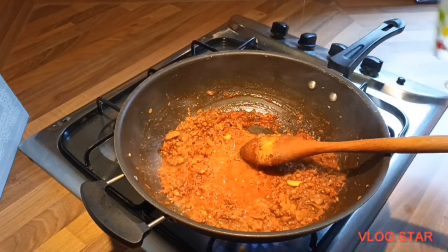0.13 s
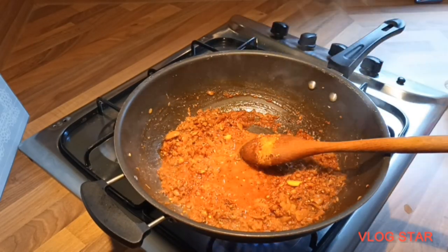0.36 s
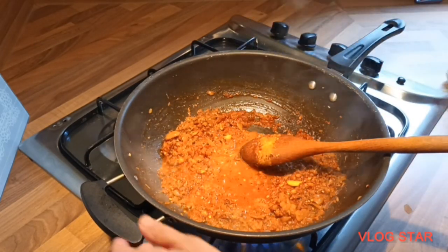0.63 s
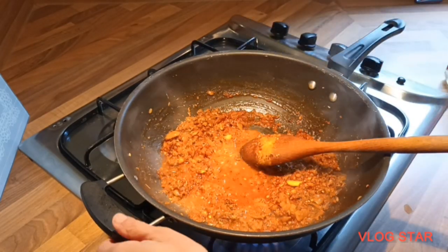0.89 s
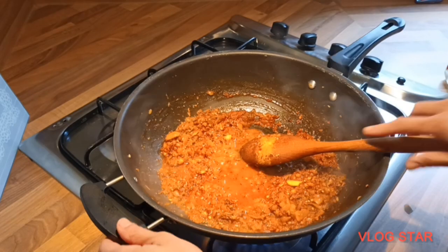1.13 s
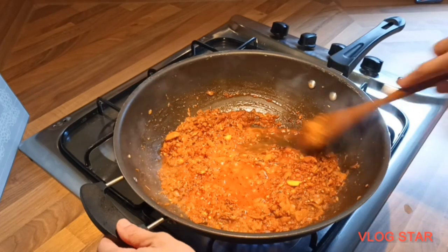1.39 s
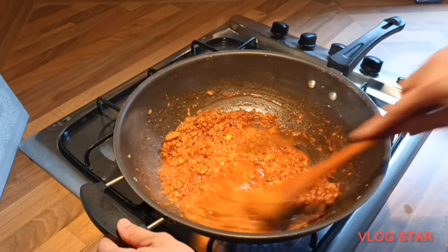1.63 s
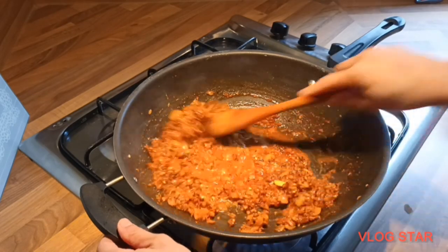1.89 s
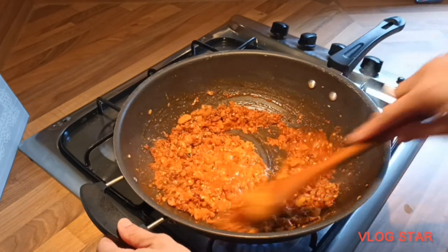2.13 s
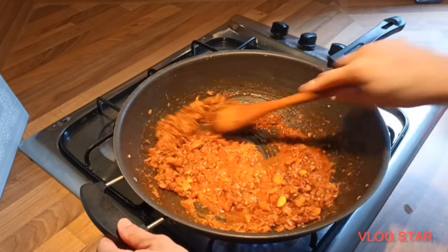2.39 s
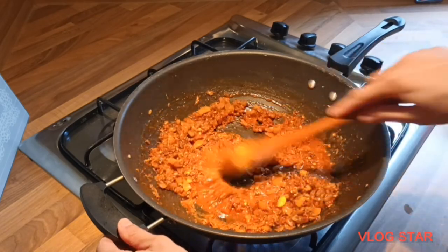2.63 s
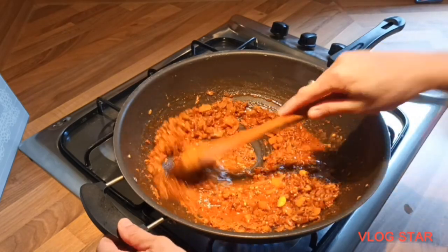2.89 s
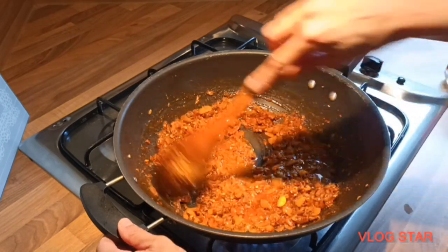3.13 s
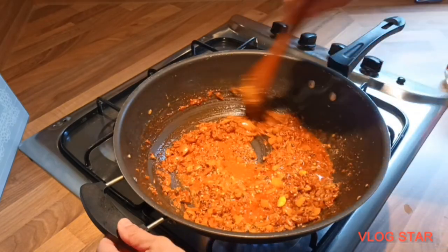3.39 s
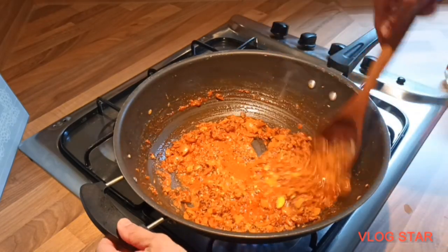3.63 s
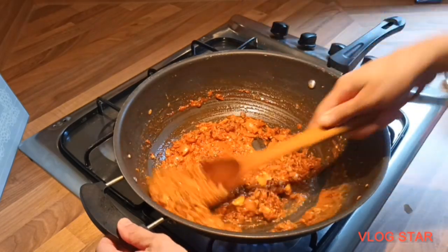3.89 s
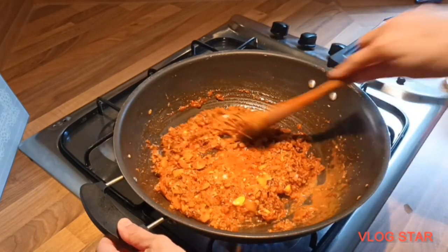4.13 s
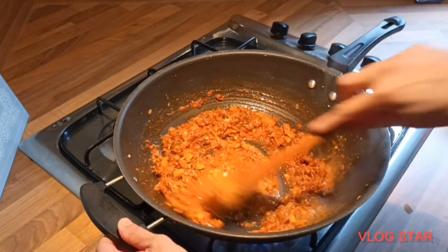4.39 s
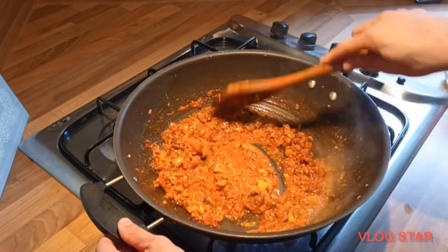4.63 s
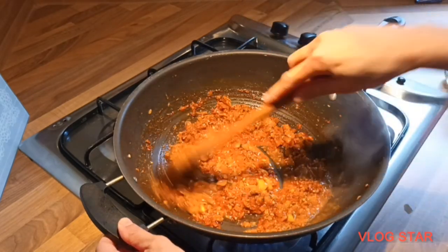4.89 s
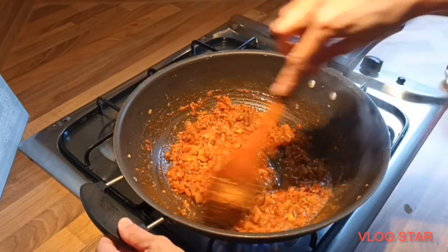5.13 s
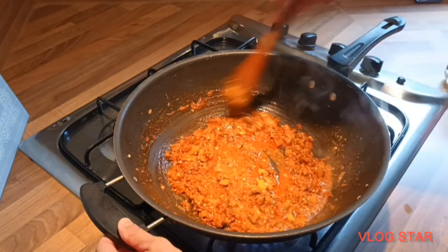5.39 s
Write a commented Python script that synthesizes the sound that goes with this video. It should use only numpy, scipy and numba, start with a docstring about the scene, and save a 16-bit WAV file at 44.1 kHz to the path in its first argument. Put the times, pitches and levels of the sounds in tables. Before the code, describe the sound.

A thin bright sizzle and quiet gas burner murmur run throughout, heard from near the hob in stereo. Early on, something is set down hard on the worktop with a short boxy echo. The hob thuds softly as the pan is gripped, then wooden scrapes come in irregular strokes, with brief spits and a strong splattering burst of frying after the middle.

```python
"""Spice paste sizzles in a steel wok on a gas hob: steam bubbles burst as dense clicks, coloured as fine hiss,
fizz and a wet splutter. The flame and the room murmur beneath; the shaken hob thuds as a low swing and rumble.
A dull knock on the worktop fills the small hard kitchen early on, a filtered burst that dies in dense echoes.
A wooden spoon drags and rasps, grains swept through gliding resonances that ring the wok. Two ports hear it."""
import sys
import numpy as np
from scipy import signal
from scipy.fft import rfft, irfft, next_fast_len
from scipy.io import wavfile
from scipy.ndimage import uniform_filter1d, map_coordinates
from numba import njit

SR = 44100
rng = np.random.default_rng(int(sys.argv[2]) if len(sys.argv) > 2 else 0)


def ratio_of_db(decibels):
    """Turn decibels (scalar or array-like) into linear amplitude factors; 0 dB maps to 1."""
    return 10 ** (np.asarray(decibels, float) / 20)


def dump(signal):
    """Clip the signal to [-1, 1] and save it as 16-bit WAV at the path in sys.argv[1]."""
    limited = np.clip(np.atleast_2d(signal).T, -1, 1)
    pcm = np.round(limited * 32767).astype(np.int16)
    wavfile.write(sys.argv[1], SR, pcm)


N = 242991
SIZE = next_fast_len(N + 8192)  # FFT length, with room for filter tails
HZ = np.arange(SIZE // 2 + 1) * SR / SIZE + 1e-3  # just above zero, so that its logarithm exists
T = np.arange(N) / SR


def columns(table):
    """Interpolate every column of a curve over time, sample by sample."""
    time_s, *rest = np.transpose(np.vstack(table))
    return [np.interp(T, time_s, column) for column in rest]


def colour(points):
    """Gain at each frequency from (Hz, dB) points, dropping to -80 dB outside them."""
    hz, db = np.transpose(points)
    return ratio_of_db(np.interp(np.log(HZ), np.log(hz), db, left=-80, right=-80))


def rings(modes, lift_db):
    """A flat response with a resonance standing on it for each (Hz, width in Hz, dB)."""
    return 1 + sum(ratio_of_db(db + lift_db) / (1 + 2j * (HZ - hz) / width) for hz, width, db in modes)


def grains(scatter_db):
    """Three unrelated streams of dense clicks whose sizes scatter: one shared, one for each port."""
    shape = (3, N)
    sizes = ratio_of_db(scatter_db * rng.standard_exponential(shape))
    streams = rng.standard_normal(shape) * sizes
    return streams / streams.std()


def walk(rate):
    """Random levels held 1 / rate s and slewed twice; spread near 1."""
    hold = int(SR / rate)
    steps = np.repeat(rng.standard_normal(N // hold + 1), hold)
    slewed = uniform_filter1d(uniform_filter1d(steps, hold), hold)
    return 1.526 * slewed[:N]


def ports(streams, gain, envelope):
    """Filter into two ports: long waves reach both alike, the left a little late; short ones differ."""
    lag_s, alike_hz = 0.00097, 770
    share = 1 / (1 + (HZ / alike_hz) ** 2.76)
    late = np.exp(-2j * np.pi * HZ * lag_s)
    both, left, right = rfft(streams * envelope, SIZE)
    common = np.array([both * late, both]) * np.sqrt(share)
    separate = np.array([left, right]) * np.sqrt(1 - share)
    level_gain = gain / np.sqrt(np.mean(np.abs(gain) ** 2))  # the colour leaves the level alone
    return irfft((common + separate) * level_gain, SIZE)[:, :N]


def patchy(x, patch_hz, patch_s, patch_db):
    """Patches of pitch swell and fade at random, as when the spot that sounds keeps moving."""
    hz, s, spectrum = signal.stft(x, SR, nperseg=1024)
    field = rng.standard_normal((400, 400))
    places = np.meshgrid(hz / patch_hz, s / patch_s, indexing="ij")
    gain = ratio_of_db(patch_db * map_coordinates(field, places, order=3, mode="wrap"))
    gain = gain / np.sqrt(np.mean(gain ** 2))
    return signal.istft(spectrum * gain, SR)[1][:, :N]


@njit
def svf(x, hz, width):
    """State-variable band-pass whose centre and width move, gain 1 at the centre."""
    out, band_state, low_state = np.empty(len(x)), 0., 0.
    for i in range(len(x)):
        g = np.tan(np.pi * hz[i] / SR)
        damping = width[i] / hz[i]
        band = (band_state + g * (x[i] - low_state)) / (1 + g * (g + damping))
        band_state = 2 * band - band_state
        low_state += 2 * g * band
        out[i] = damping * band
    return out


def swept(streams, hz, width):
    """Each stream twice through a moving resonance; rms 1."""
    y = np.array([svf(svf(stream, hz, width), hz, width) for stream in streams])
    return y / y.std()


def strokes(rows, rise_db_s, fall_db_s, rest_db=-120):
    """Level of events that rise, hold and fall; a pitch glides through each hold, and the loudest event leads."""
    t = T[::32]
    start, hold, db, *hz = np.array(rows).T[..., None]
    rise_db = rise_db_s * np.maximum(start - t, 0)
    fall_db = fall_db_s * np.maximum(t - start - hold, 0)
    gain = ratio_of_db(np.maximum(db - rise_db - fall_db, -400))
    level = np.interp(T, t, np.sqrt((gain ** 2).sum(axis=0) + ratio_of_db(rest_db) ** 2))
    if not hz:
        return level
    progress = np.clip((t - start) / np.maximum(hold, .02), 0, 1)
    pitch = hz[0] + (hz[1] - hz[0]) * progress
    return level, np.interp(T, t, (gain * pitch).sum(axis=0) / gain.sum(axis=0))


def sizzle():
    """Tiny steam bubbles make hiss and fizz; larger ones splutter lower where the spoon bares hot steel."""
    # colours of fine hiss, highest fizz and wet splutter: (frequency [Hz], relative density [dB per Hz])
    hiss_colour = [(6000, -18), (7000, -18.5), (8700, -21), (9200, -8), (10400, -0.5), (11200, -3),
                   (12000, -8.5), (12400, -15.5), (13600, -14), (14600, -35)]
    fizz_colour = [(13000, -38), (13900, -5), (14400, -3), (15100, 6), (16200, -0.5)]
    wet_colour = [(880, -49.5), (1500, -11), (1910, -8), (2780, -5.5), (3720, -1), (5620, 2.5),
                  (7250, -4.5), (7960, -13.5), (8500, -7), (11000, -34), (18700, -120)]
    # frying before trims: (time [s], fine hiss level [dB], wet splutter over hiss [dB])
    frying_curve = [(0.0, -48, -9), (0.3, -50, -7), (0.99, -48.5, -11), (1.38, -48, -5.5),
                    (1.6, -41.5, -1.5), (1.98, -44.5, -7), (2.29, -44.5, -9), (2.6, -45.5, -10),
                    (3.44, -46, -10.5), (3.52, -48.5, 0.5), (3.66, -39.5, 1), (3.74, -34.5, -2.5),
                    (3.82, -37, 2), (3.9, -36, -0.5), (4.13, -40, -1), (4.17, -40.5, -7.5),
                    (4.73, -44, -10), (4.95, -45.5, -9), (5.12, -43, -6.5), (5.33, -47, -9),
                    (5.51, -44.5, -7)]
    # the spoon bares hot steel and the paste spits, before trim: (time [s], hold [s], level [dB])
    spits = [(3.19, 0.0034, -42), (4.62, .005, -51), (5.165, .01, -40)]
    calm_db, fizz_growth = -49, 0.34  # fizz gains this many dB per dB of hiss over calm
    hiss_db, wet_db = columns(frying_curve)
    fizz_db = -12 + fizz_growth * (hiss_db - calm_db) + 3.2 * walk(9)  # over the hiss, before trims
    spit = strokes(spits, rise_db_s=242, fall_db_s=244)
    hiss = ports(grains(1.0), colour(hiss_colour), ratio_of_db(hiss_db + 4.0 + .5 * walk(30.21)))
    fizz = ports(grains(2.3), colour(fizz_colour), ratio_of_db(hiss_db + fizz_db + 3.0))
    wet_gain = np.hypot(ratio_of_db(hiss_db + wet_db), spit) * ratio_of_db(3.0)
    wet = ports(grains(2.1), colour(wet_colour), wet_gain)
    frying = patchy(hiss + fizz, 503.0, 0.067, 0.79) + patchy(wet, 109.97, .04, 4.97)
    pan_db = -.3 + 1.3 * walk(8)  # left minus right
    return frying * ratio_of_db(np.array([pan_db, -pan_db]) / 2)


def kitchen():
    """Gas flame and room murmur: coloured noise flickering a little in patches of pitch."""
    # colour of the murmur: (frequency [Hz], relative density [dB per Hz])
    murmur_colour = [(15, -44), (25, -4), (91, -7.5), (184, -11), (253, -12.5), (579, -10.5), (631, -11.5),
                     (1240, -16), (1510, -9), (2030, -17), (4000, -14.5), (5200, -27), (8800, -120)]
    murmur = ports(grains(0.64), colour(murmur_colour), ratio_of_db(-59.0))
    return patchy(murmur, 110., .05, 2.2)


def thud():
    """A soft low swing of the hob with a looser rumble around it, nearly the same at both ports."""
    # hob and worktop shaken by the cook, levels before trim, pitch before its wobble:
    # (time [s], hold [s], level [dB], pitch at start [Hz], pitch at end [Hz])
    shakes = [(0.06, 0.08, -49, 78.7, 57), (0.27, .06, -48.5, 78, 79), (0.38, .005, -34.5, 73, 71),
              (0.46, 0.044, -44, 70.4, 58), (0.59, 0.023, -47.5, 58, 70), (0.945, .03, -45, 109.8, 98),
              (1.0, 0.029, -29, 89, 68), (1.045, .07, -34.5, 41.6, 42.3), (1.23, 0.0042, -43.5, 46.8, 46),
              (1.58, .04, -39, 64.6, 73), (1.66, 0.055, -55.5, 85.26, 70), (1.99, .07, -54.5, 69.68, 67),
              (2.56, 0.027, -46, 59.7, 55), (2.65, .005, -46, 84.8, 88), (2.74, .25, -64.5, 97.5, 102),
              (3.525, 0.1, -47.5, 71.4, 58), (3.68, .02, -48.5, 124.4, 150), (3.88, 0.0047, -58, 97.6, 81),
              (4.21, 0.0052, -59.5, 76, 62), (4.54, .005, -59, 83.5, 84), (4.64, 0.047, -44.5, 97.6, 97),
              (4.83, .005, -59.5, 66, 75), (5.25, .005, -67, 58.9, 59)]
    gain, hz = strokes(shakes, rise_db_s=802, fall_db_s=350.5, rest_db=-70)
    wobbling_hz = hz * (1 + 0.093 * walk(23))
    swing = np.sqrt(2) * np.sin(2 * np.pi * np.cumsum(wobbling_hz) / SR)
    rumble = swept(grains(0), 45 + 0.44 * hz, 110 + 0.033 * hz)
    return ports(swing + ratio_of_db(-2.5) * rumble, np.ones_like(HZ), gain * ratio_of_db(-2.0))


def knock():
    """A sudden blow on the worktop, then dense echoes that hold, lose their treble first and stop."""
    # dying away in the room, before trims: (time [s], level [dB], treble over level [dB])
    decay = [(.249, -22.5, 0), (.256, -16.5, -7.5), (.268, -23, -7), (.33, -24.5, -8.5), (.405, -27, -13.5),
             (.44, -25, -12.5), (.475, -26.5, -17), (.505, -35, -16), (.55, -43.5, -13.5),
             (.62, -57.5, -36), (.7, -92, -17)]
    # colours of the dull body and the brighter edge: (frequency [Hz], relative density [dB per Hz])
    body_colour = [(24, -52), (40, -19), (120, -14.5), (151, -15.5), (236, -8), (267, -3), (569, -4.5),
                   (654, -10.5), (1600, -20.5), (2080, -43), (3520, -120)]
    edge_colour = [(650, -36), (1100, -4.5), (1300, -7.5), (2790, -9.5), (3670, -22), (4220, -19),
                   (5790, -25), (8000, -37.5), (10400, -75), (17600, -120)]
    # worktop resonances, before their common lift: (frequency [Hz], width [Hz], level [dB])
    worktop_modes = [(123.6, 9.2, 5.5), (185.4, 4.8, 9), (239.3, 6.7, 7), (343, 15, 0.5), (540, 9.8, -4),
                     (642.6, 19, 11), (662, 35, 7), (745, 50, 5.5), (824, 14, 7.5), (908, 28, 5.5),
                     (1007, 15.5, 4.5), (1087, 8.7, -19), (1210, 16, -5), (1316, 13, 4), (1608, 42, -5)]
    level_db, treble_db = columns(decay)
    blow_s = decay[0][0]
    on = (T > blow_s) * (T < decay[-1][0])
    rattle_db = 1.1 * walk(131.4)
    ring = rings(worktop_modes, lift_db=7.5)
    top = 1 / (1 + (3100 / HZ) ** 6)  # share of the highest treble, which does not ring
    body_gain = on * ratio_of_db(level_db + 6.0 + rattle_db)
    body = ports(grains(2.64), colour(body_colour) * ring, body_gain)
    edge_gain = on * ratio_of_db(level_db + treble_db + 4.0 + rattle_db)
    edge = ports(grains(0.5), colour(edge_colour) * ring * (1 - top), edge_gain)
    top_fade_db = 45 * np.abs(T - blow_s)  # the highest treble dies 45 dB/s faster
    top_edge = ports(grains(0.59), colour(edge_colour) * top, edge_gain * ratio_of_db(-10.5 - top_fade_db))
    return (body + patchy(edge + top_edge, 123.0, 0.06, 1.3)) * (T > blow_s)


def scrape():
    """Uneven stick and slip of wood on steel, its pitch gliding with each stroke, ringing the wok."""
    # the spoon's weight drags on the steel, then its edge rasps; levels before trims:
    # (time [s], hold [s], level [dB], pitch at start [Hz], pitch at end [Hz])
    drags = [(0.94, 0.0051, -47.5, 343, 350), (1.01, 0.0042, -36.5, 240, 250), (1.12, 0.016, -56, 240, 130),
             (1.15, 0.036, -55, 720, 1000), (1.195, 0.06, -48, 800, 850), (1.45, 0.058, -58.5, 704, 700),
             (1.58, 0.037, -46.5, 536.7, 540), (1.65, .07, -60.5, 700, 750), (1.82, 0.043, -57, 250, 200),
             (1.89, 0.054, -44, 580, 630), (2.04, 0.046, -56, 500, 430), (2.48, 0.057, -44.5, 600, 520),
             (2.62, 0.055, -52, 680, 460), (3.03, 0.087, -51.5, 415, 550), (3.18, 0.13, -48.5, 700, 610),
             (3.26, 0.11, -53, 330, 290), (3.46, 0.035, -46, 630, 580), (3.69, 0.047, -49.5, 655, 550),
             (4.01, .005, -54.5, 593, 510), (4.61, 0.045, -63, 620, 890), (4.79, 0.069, -52.5, 240, 220),
             (4.86, 0.025, -51, 520, 410), (5.065, 0.022, -44.5, 340, 350), (5.12, 0.17, -47, 720, 615),
             (5.35, .17, -56, 600, 660)]
    rasps = [(1.05, 0.017, -60, 957, 600), (1.18, 0.067, -44.5, 1500, 1330), (1.41, 0.21, -44, 1660, 1230),
             (1.68, 0.16, -51.5, 2190, 1950), (1.895, 0.073, -36, 1029, 1500),
             (2.0, 0.063, -48, 1500, 1370), (2.2, .005, -54, 1380, 1360), (2.36, 0.071, -47, 1500, 1380),
             (2.49, 0.047, -45, 1014, 840), (3.09, 0.064, -52, 1150, 1270), (3.19, 0.0053, -34, 1235, 1100),
             (3.22, 0.071, -44, 1400, 886), (3.47, 0.044, -42.5, 2090, 1730),
             (3.52, 0.19, -34.5, 1300, 1600), (3.77, 0.28, -46, 2245, 1610),
             (4.11, 0.23, -54.5, 1920, 2050), (4.62, 0.0047, -42.5, 1550, 1420),
             (4.8, 0.071, -53.5, 960, 920), (5.01, 0.0041, -54.5, 1300, 970), (5.09, .03, -47.5, 990, 1340),
             (5.16, 0.027, -35.5, 1770, 1360), (5.23, 0.039, -40.5, 1070, 930),
             (5.49, .02, -50, 1730, 1700)]
    # wok resonances, before their common lift: (frequency [Hz], width [Hz], level [dB])
    wok_modes = [(263, 6.6, -3), (316, 29, 4.5), (423.2, 8.8, 6.5), (546, 23.5, 13), (670, 120, 9.5),
                 (727.4, 11, 7), (962, 37, 7.5), (1113, 10, 11), (1300, 5.9, -0.5), (1500, 16.5, 4.5),
                 (1653, 15, 1.5), (1864, 5.6, 0), (2190, 20, 7.5), (2417, 116, -1)]
    firm_db = -36  # a lighter rasp than this is narrower in pitch
    drag_gain, drag_hz = strokes(drags, rise_db_s=655.5, fall_db_s=288)
    rasp_gain, rasp_hz = strokes(rasps, rise_db_s=541, fall_db_s=291)
    slip_db = 1.5 * walk(60)
    rub = grains(0.8)
    # slips come almost regularly, so a narrow singing tone rides on the broad rub
    drag_rub = swept(rub, drag_hz, 180 + 0.23 * drag_hz)
    drag_tone = swept(rub, drag_hz, 0.14 * drag_hz)
    drag = drag_rub + ratio_of_db(-13.0) * drag_tone
    breadth = np.clip((rasp_gain / ratio_of_db(firm_db)) ** 0.41, .35, 1)
    rasp_rub = swept(rub, rasp_hz, breadth * (300 + 0.68 * rasp_hz))
    rasp_tone = swept(rub, rasp_hz, 0.089 * rasp_hz)
    rasp = rasp_rub + ratio_of_db(-15.0) * rasp_tone
    spoon = drag * drag_gain * ratio_of_db(slip_db) + rasp * rasp_gain * ratio_of_db(0.3 * slip_db)
    ringing = ports(spoon, rings(wok_modes, lift_db=2.5), ratio_of_db(-4.0))
    return patchy(ringing, 89.8, .08, 3.65)


def scene():
    """All sources at the two ports."""
    return sizzle() + kitchen() + thud() + knock() + scrape()


def top_cut(x):
    """Nothing passes above the cut-off."""
    return signal.sosfilt(signal.butter(12, 17070, fs=SR, output="sos"), x)


def record(dry):
    """The two ports differ a little in colour, and nothing above 15750 Hz passes."""
    # colour of the ports: (frequency [Hz], left minus right [dB])
    port_tilt = [(60, 2.5), (110, 1), (200, -2), (380, 3.5), (700, -0.5), (1290, -1.5), (2380, 2.5),
                 (4400, -0.5), (8120, 2.5), (15000, -4.5)]
    hz, db = np.transpose(port_tilt)
    tilt_db = np.interp(np.log(HZ), np.log(hz), db) / 2
    gain = ratio_of_db(np.array([tilt_db, -tilt_db])) * (HZ < 15750)
    mix = irfft(rfft(dry, SIZE) * gain, SIZE)[:, :N]
    return top_cut(mix)


dry = scene()
out = record(dry)
dump(out)
```